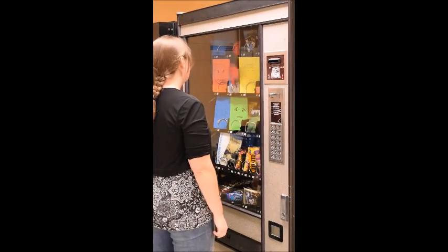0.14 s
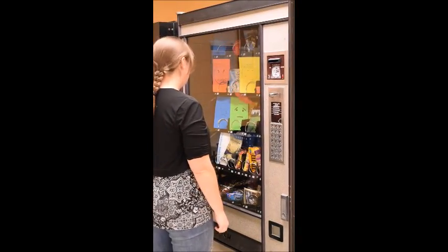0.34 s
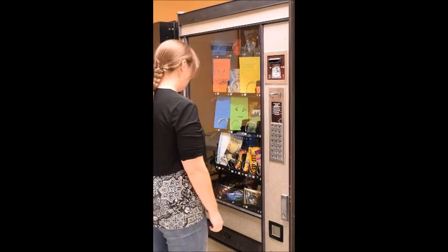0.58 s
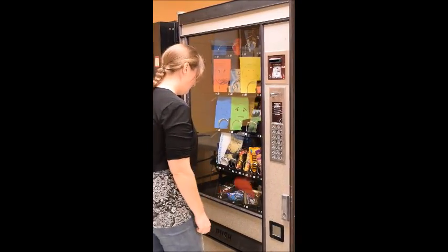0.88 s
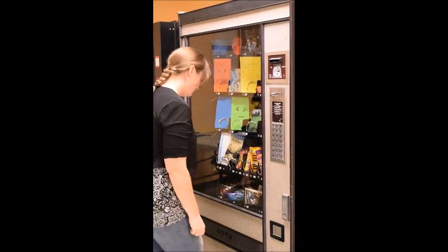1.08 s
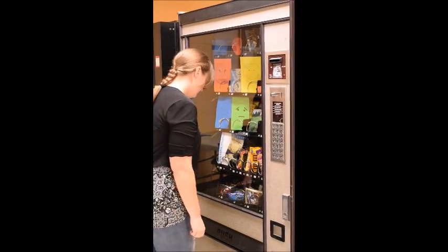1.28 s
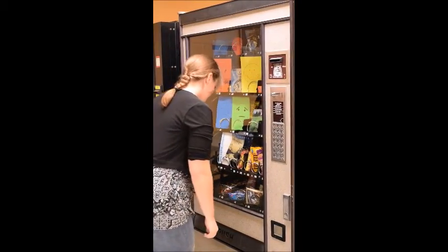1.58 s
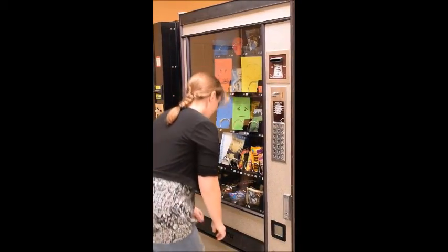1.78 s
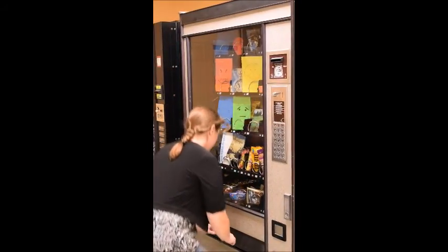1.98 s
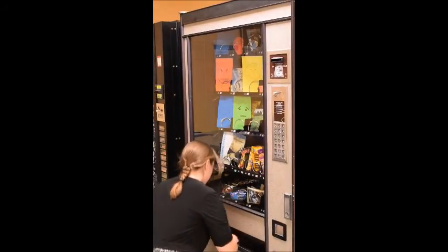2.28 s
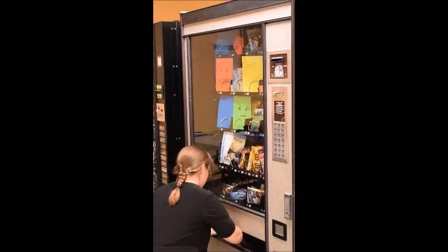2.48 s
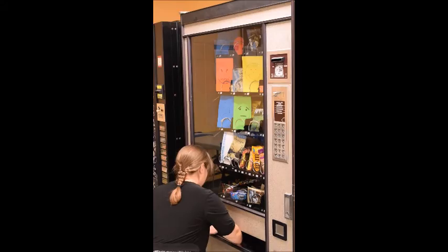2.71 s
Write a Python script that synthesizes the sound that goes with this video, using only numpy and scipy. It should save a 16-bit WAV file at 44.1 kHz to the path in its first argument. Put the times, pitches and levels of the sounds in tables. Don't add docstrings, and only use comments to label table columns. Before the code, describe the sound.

A vending machine drive rattles from the start, its dense metallic clicks pulsing about eleven times a second and quickening until it stops near 1.5 s, with a faint rising squeak at 0.85 s. Compressor hum and fan noise continue. Around 2.0 s the plastic flap cracks and thuds sharply; bumps at 2.3-2.4 s and a hollow tap at 2.6 s follow, with faint cloth rustle and short hall echo.

```python
import sys
import numpy as np
from scipy import signal
from scipy.fft import rfft, irfft
from scipy.io import wavfile

SR = 44100
rng = np.random.default_rng(int(sys.argv[2]) if len(sys.argv) > 2 else 0)


def wav_record(signal):
    frames = np.transpose(np.atleast_2d(signal))
    bounded = np.clip(frames, -1, 1)
    quanta = np.round(bounded * 32767).astype(np.int16)
    wavfile.write(sys.argv[1], SR, quanta)


def invert_db(x):
    u = np.asarray(x, float) / 20
    return 10 ** u


N = 125685


def rms_one(x):
    return x / np.sqrt(np.mean(x ** 2) + 1e-20)


def in_time(rows):
    s, *columns = np.transpose(rows)
    return [np.interp(np.arange(N) / SR, s, column) for column in columns]


def colour(x, points):
    hz, db = np.transpose(points)
    axis = np.log(np.arange(len(x) // 2 + 1) * SR / len(x) + 1)
    return irfft(rfft(x) * invert_db(np.interp(axis, np.log(hz), db)), len(x))


def drift(rate):
    r = np.exp(-80 * np.pi * rate / SR)
    noise = rng.standard_normal(N // 40 + 2002)
    slow = signal.lfilter([1], [1, -2 * r, r * r], noise)[2000:]
    return np.interp(np.arange(N) / 40, np.arange(len(slow)), rms_one(slow))


def resonate(x, hz, width_hz):
    r = np.exp(-np.pi * width_hz / SR)
    poles = [1, -2 * r * np.cos(2 * np.pi * hz / SR), r * r]
    return signal.lfilter([(1 - r * r) / 2, 0, (r * r - 1) / 2], poles, x + 1e-18)


def burst(s, rise, fall):
    t = np.maximum(np.arange(N) / SR - s, 0)
    return (1 - np.exp(-(t / rise) ** 2)) * np.exp(-np.maximum(t - rise, 0) / fall)


# t/s at the top, level/dB
TURNS = [(.004, -29), (.09, -22.5), (.18, -24), (.269, -25.5), (.357, -26.5), (.437, -23.5), (.513, -23.5),
         (.589, -23.5), (.664, -27), (.735, -26), (.797, -26), (.86, -23), (.925, -27), (.978, -26.5),
         (1.036, -28.5), (1.094, -26), (1.149, -27.5), (1.195, -26), (1.244, -29), (1.286, -28.5),
         (1.324, -28), (1.364, -28.5), (1.4, -28.5), (1.433, -28), (1.456, -29), (1.483, -26.5)]
# f/Hz, width/Hz, level/dB
METAL_MODES = [(2020, 53, -1.5), (2092, 67, -0.5), (2354, 27, -8.5), (2494, 26, -2.5), (3740, 65, -7.5),
               (4330, 37, -5), (5410, 76, -10), (5960, 180, 2.5), (6070, 40, -13), (7400, 51, -33),
               (7720, 40, -3.5), (9000, 53, -9), (11400, 43, -11), (13000, 260, -14)]
# f/Hz, level/dB per Hz
RATTLE_SPECTRUM = [(1000, -4.5), (2300, -2.5), (3000, -14.5), (5600, -5), (8200, -7.5), (9200, -15.5),
                   (13000, -11), (15800, -23.5)]


def drive():
    rise_s, fall_s, clicks_per_s = .011, .013, 6000
    grind_db, stop_s, stop_fall_s = -39.5, 1.49, .015
    t = np.arange(N) / SR
    shape = invert_db(grind_db) * np.exp(-np.maximum(t - stop_s, 0) / stop_fall_s)
    for s, db in TURNS:
        swell = np.exp(-((t - s) / rise_s) ** 2)
        decay = np.exp(-np.abs(t - s) / fall_s)
        shape += invert_db(db) * np.where(t < s, swell, decay)
    sizes = invert_db(3.0 * np.minimum(rng.exponential(1, N), 5)) * rng.choice([-1, 1], N)
    clicks = shape * rms_one(sizes * (rng.random(N) < clicks_per_s / SR))
    rings = np.zeros(N)
    for k, (hz, width, db) in enumerate(METAL_MODES):
        ring = resonate(clicks * invert_db(1.6 * drift(24)), hz, width)
        rings += (-1) ** k * invert_db(db) / np.sqrt(width) * ring
    broad = colour(clicks, [(500, -69)] + RATTLE_SPECTRUM)
    level = invert_db(-11) * np.sqrt(np.mean(shape ** 2))
    return level * (invert_db(-1) * rms_one(rings) + rms_one(broad))


def contacts(rows, octaves, rise):
    noise = rng.standard_normal(N) * invert_db(1.0 * rng.standard_normal(N))
    out = np.zeros(N)
    for s, db, hz, length in rows:
        edges = [hz / 2 ** octaves, min(hz * 2 ** octaves, .45 * SR)]
        band = signal.butter(2, edges, "band", fs=SR, output="sos")
        out += invert_db(db) * signal.sosfilt(band, burst(s, rise, length) * noise) * np.sqrt(7000 / hz)
    return out


# t/s, level/dB, centre f/Hz, length/s
CRACKS = [(1.974, -22, 5760, 0.0067), (2.012, -28, 7100, 0.0078), (2.029, -21, 7800, 0.0051),
          (2.038, -12, 7900, 0.0057), (2.0385, -29, 13000, .003), (2.050, -12, 8300, 0.0036),
          (2.056, -17, 6800, 0.0084), (2.1, -37, 7250, 0.029), (2.215, -43, 10500, .012),
          (2.236, -34, 6950, 0.0043), (2.266, -40, 6500, .005), (2.297, -38, 7500, 0.0073),
          (2.322, -29, 6660, .012), (2.324, -37, 12000, 0.014), (2.339, -34, 7800, 0.011),
          (2.383, -42, 7550, .006), (2.424, -39, 6440, 0.0069), (2.483, -49, 3500, .002),
          (2.583, -44.5, 7900, 0.015), (2.602, -48, 7500, .012), (2.846, -45, 9900, .004)]
# t/s, level/dB, centre f/Hz, length/s
THUDS = [(1.974, -16.5, 1770, 0.014), (1.976, -23.5, 890, 0.036), (2.012, -25, 1620, 0.014),
         (2.036, -21.5, 1540, 0.021), (2.053, -11, 1800, 0.015), (2.056, -13.5, 3800, 0.0066),
         (2.066, -12, 784, 0.021), (2.1, -30, 1530, 0.013), (2.265, -27, 1000, .025),
         (2.295, -22, 1440, 0.023), (2.32, -16, 1920, 0.016), (2.326, -30.5, 3400, 0.01),
         (2.33, -18, 453, 0.021), (2.345, -21, 1300, 0.02), (2.378, -33, 3000, 0.018),
         (2.41, -15.5, 276, 0.029), (2.481, -29, 2450, 0.0033), (1.53, -27.5, 1290, 0.026),
         (2.075, -12.5, 414, .04)]
# f/Hz, level/dB, t60/s
FLAP_MODES = [(630, -12, .04), (755, 7.5, .09), (1303, -1.5, .025), (1454, 1.5, 0.017), (1800, -16, .025),
              (2080, -8, 0.033)]


def flap():
    thuds = contacts(THUDS, 0.5, rise=0.0032) * invert_db(-5.5)
    out = contacts(CRACKS, 0.34, rise=0.00085) + thuds
    for hz, db, t60 in FLAP_MODES:
        width = np.log(1000) / np.pi / t60
        wavering = thuds * invert_db(2.0 * drift(39))
        out += invert_db(db - 9.5) * np.sqrt(hz / width) * resonate(wavering, hz, width)
    return out


# t/s, level/dB, f/Hz, length/s
TAPS = [
    (2.427, -28, 1490, 0.0076),
    (2.579, -24.5, 1434, 0.019),
]


def taps():
    rise_s, sag_per_s = .005, 2.5
    t = np.arange(N) / SR
    out = np.zeros(N)
    for s, db, hz, length in TAPS:
        level = invert_db(db + 3.1 * drift(90)) * burst(s, rise_s, length)
        pitch = hz * (1 - sag_per_s * np.clip(t - s, 0, .1) + 0.021 * drift(58))
        out += level * np.sin(2 * np.pi * np.cumsum(pitch) / SR)
    return out


# t/s, f/Hz, level/dB
SQUEAK = [
    (.76, 620, -52),
    (.82, 950, -38),
    (.84, 1150, -44),
    (.857, 1400, -33),
    (.876, 1780, -35),
    (.888, 2000, -56),
]


def squeak():
    hz, db = in_time(SQUEAK)
    t = np.arange(N) / SR
    on = (t > SQUEAK[0][0]) & (t < SQUEAK[-1][0])
    return on * invert_db(db + 2.7 * drift(60)) * np.sin(2 * np.pi * np.cumsum(hz) / SR)


# t/s, level/dB
RUSTLE = [
    (0, -75),
    (1.6, -63),
    (1.95, -59),
    (2.2, -54),
    (2.45, -64.5),
    (2.85, -75),
]


def rustle():
    band = signal.butter(2, [3000, 11000], "band", fs=SR, output="sos")
    hiss = signal.sosfilt(band, rng.standard_normal(N))
    return invert_db(in_time(RUSTLE)[0] + 2.0 * drift(25)) * rms_one(hiss)


# f/Hz, level/dB rms
HUM = [(59.2, -52.5), (118.4, -34), (176.5, -34.5), (221, -39), (254, -41.5), (292, -41), (350.5, -40),
       (532, -52.5), (646, -65.5)]
# t/s, level/dB of gain
OPENING = [(0, 8), (.2, -3), (1.0, 0.5), (2.0, -2), (2.15, 5.5), (2.25, 0), (2.33, 11.5), (2.45, 7.5),
           (2.6, 4.5), (2.85, 5)]
# f/Hz, level/dB per Hz
AIR = [(22, -24), (45, -11), (100, -7.5), (200, -1.5), (400, -10), (1100, -18.5), (2600, -32.5),
       (15500, -62.5)]


def cooler():
    beat_per_s, beat_top_s, beat_depth = 3.05, .455, .7
    t = np.arange(N) / SR
    tones = []
    for k, (hz, db) in enumerate(HUM):
        level = invert_db(db + 1.5 + 3.0 * drift(5.6) * (k != 1))
        pitch = hz * (1 + 0.00792 * drift(4.98))
        tones.append(level * np.sin(2 * np.pi * np.cumsum(pitch) / SR))
    beat = 1 + beat_depth * np.cos(2 * np.pi * beat_per_s * (t - beat_top_s))
    opening_db, = in_time(OPENING)
    low = tones[0] + beat * tones[1]
    middle = invert_db(opening_db) * tones[2] + invert_db(0.67 * opening_db) * sum(tones[3:5])
    air = rms_one(colour(rng.standard_normal(N) * invert_db(0.6 * drift(43)), AIR))
    return low + middle + sum(tones[5:]) + invert_db(-30) * air


def hall(x):
    t60_s, treble_t60_s = 0.53, 0.39
    t, noise = np.arange(SR) / SR, rng.standard_normal(SR)
    low = signal.lfilter(*signal.butter(2, 3000, fs=SR), noise)
    tail = low * invert_db(-60 * t / t60_s) + (noise - low) * invert_db(-60 * t / treble_t60_s)
    tail = tail * (t > .004)
    tail = signal.lfilter(*signal.butter(1, 4100, fs=SR), tail)
    return signal.fftconvolve(x, tail / np.sqrt(np.sum(tail ** 2)))[:N]


def scene():
    motor, hand = drive(), flap()
    echo = hall(invert_db(-6) * motor + invert_db(-9) * hand)
    return (motor + hand + echo + squeak() + taps() + cooler() + rustle())[None]


def roll_off(x):
    return signal.sosfilt(signal.butter(12, 15910, fs=SR, output="sos"), x)


def record(dry):
    mix = signal.sosfilt(signal.cheby2(16, 40, 15950, fs=SR, output="sos"), dry)
    return roll_off(mix)


dry = scene()
out = record(dry)
wav_record(out)
```